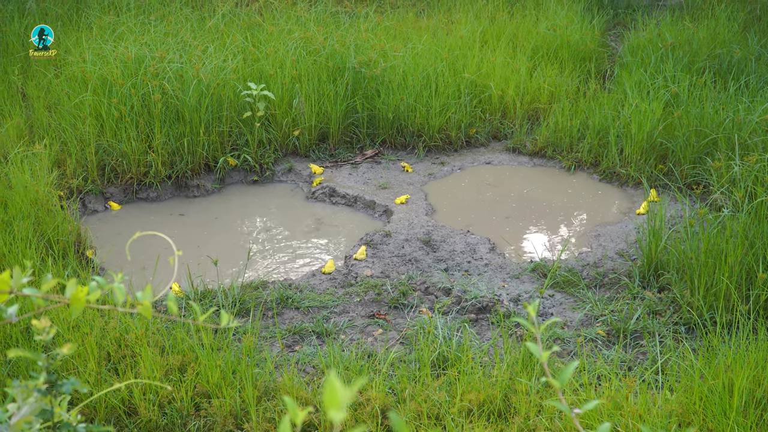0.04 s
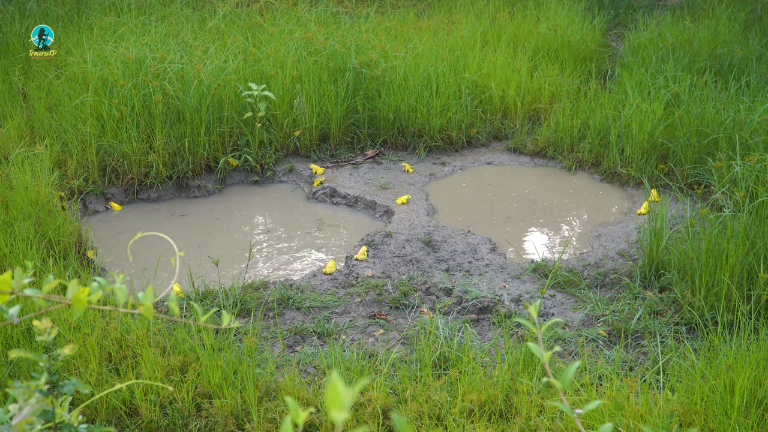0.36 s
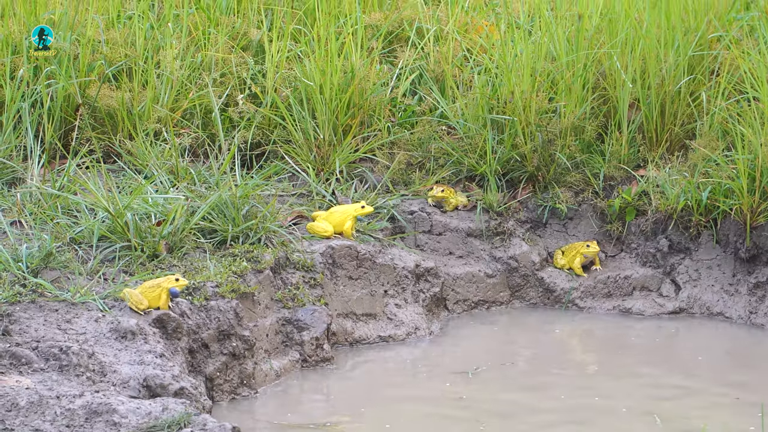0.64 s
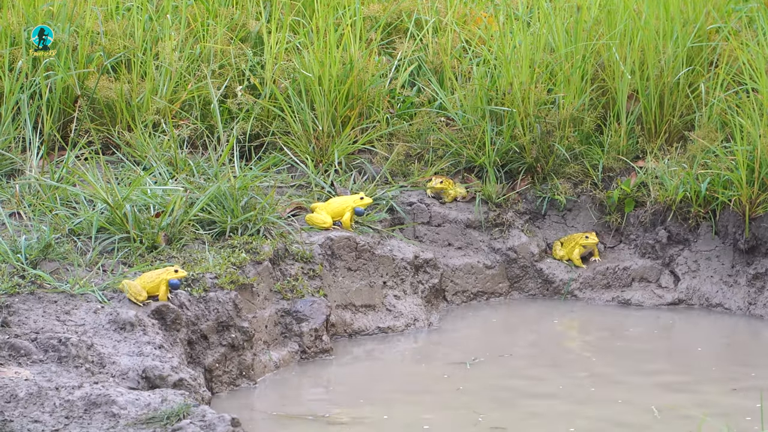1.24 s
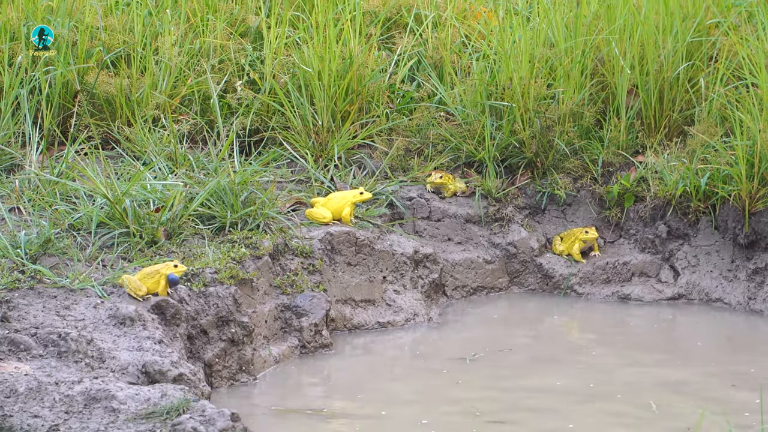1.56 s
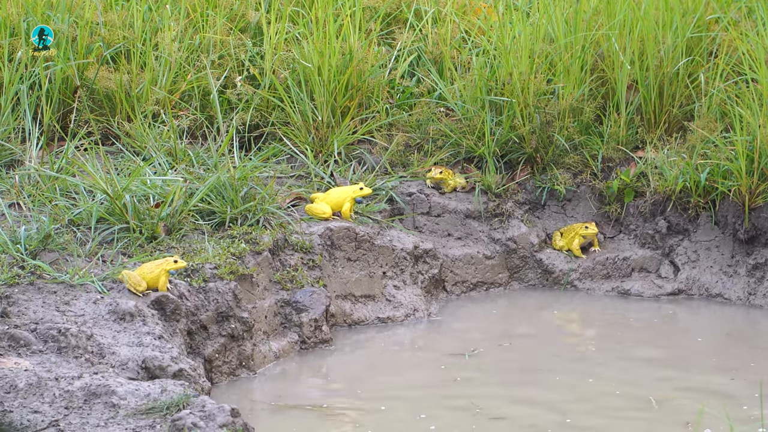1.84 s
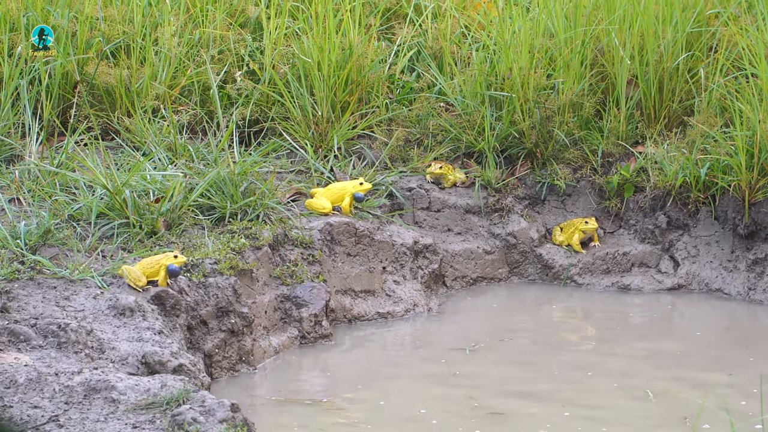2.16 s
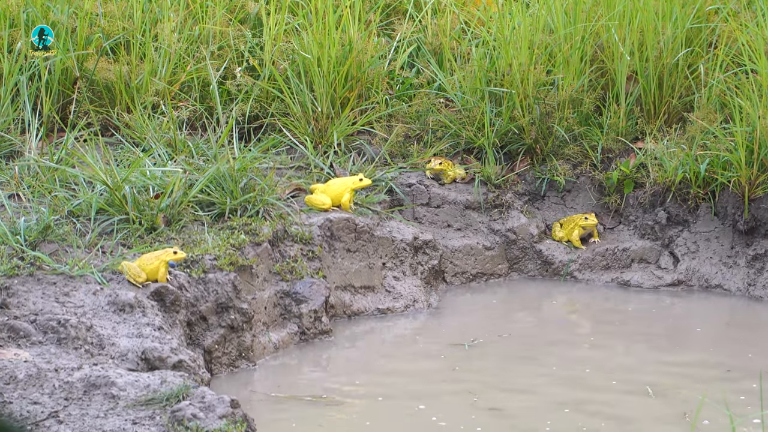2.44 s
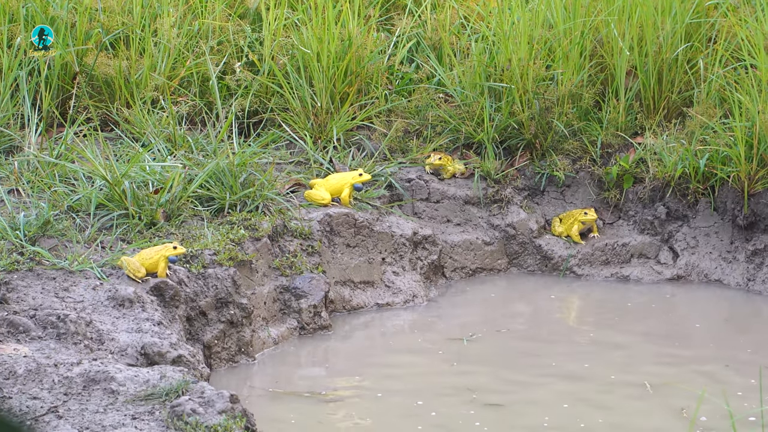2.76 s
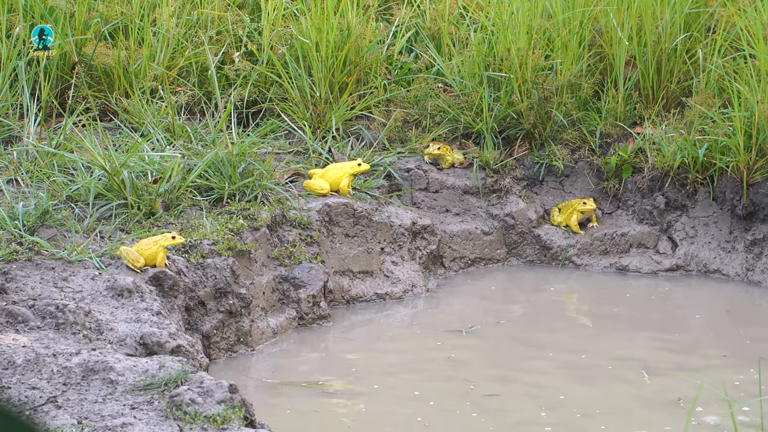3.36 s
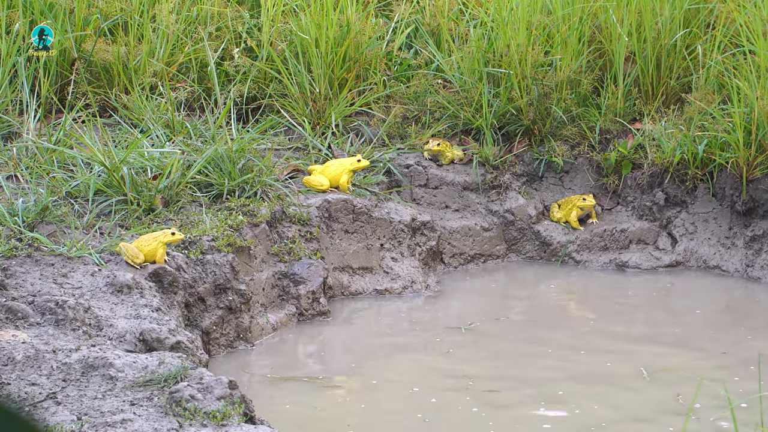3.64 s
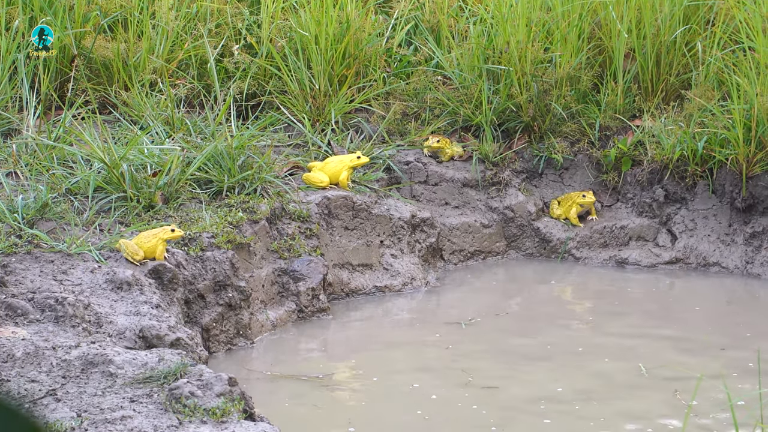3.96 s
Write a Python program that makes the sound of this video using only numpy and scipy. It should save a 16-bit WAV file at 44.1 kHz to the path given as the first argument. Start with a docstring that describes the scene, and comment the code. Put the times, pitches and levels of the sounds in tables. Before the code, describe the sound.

Several frogs trade loud, pulsing croaks outdoors by a pool, some near and some farther off. Behind them insects hiss and buzz in the grass, with a brief low wind rumble on the microphone and later quick, high bird chirps.

```python
"""A muddy pool, with bullfrogs croaking in overlapping turns near and far. Each croak is a train of
about 75 pulses a second that slows as the air runs out; a pulse is two snaps of the vocal cords that
ring the vocal sacs and the throat. Behind them insects hiss and buzz in the grass, small birds chirp,
and a breeze rocks the microphone. The background steps up early on, as the microphone moves closer."""
import sys
import numpy as np
from scipy import signal
from scipy.fft import rfft, irfft, next_fast_len
from scipy.io import wavfile
from scipy.ndimage import uniform_filter1d, minimum_filter1d, map_coordinates

SR = 44100
rng = np.random.default_rng(int(sys.argv[2]) if len(sys.argv) > 2 else 0)


def log_audio(samples):
    """Write samples as a 16-bit WAV file to the path given in sys.argv[1]."""
    # one column per channel
    frames = np.atleast_2d(samples).T
    # limit to full scale, then quantise
    limited = np.clip(frames, -1, 1)
    pcm = np.round(limited * 32767).astype(np.int16)
    wavfile.write(sys.argv[1], SR, pcm)


N = 176400
TIME = np.arange(N) / SR


def amp(db):
    return 10 ** (np.asarray(db) / 20)


def unit_rms(x):
    return x / np.sqrt(np.mean(x ** 2) + 1e-20)


def along(points, hz):
    """Read (frequency, value) points on a log axis."""
    freqs, values = np.transpose(points)
    return np.interp(np.log(hz + 1), np.log(freqs + 1), values)


def curve(points):
    """Read (time, value) points at every sample."""
    return np.interp(TIME, *np.transpose(points))


def filtered(x, response):
    """Shape x by a gain that depends on frequency."""
    size = next_fast_len(N + SR // 2)
    return irfft(rfft(x, size) * response(np.fft.rfftfreq(size, 1 / SR)), size)[:N]


def noise(spectrum):
    """Coloured noise of rms 1."""
    return unit_rms(filtered(rng.standard_normal(N), lambda hz: amp(along(spectrum, hz))))


def wobble(per_s):
    """A smooth random curve with per_s knots a second."""
    return map_coordinates(rng.standard_normal(4000), [TIME * per_s], mode="wrap")


def minimum_phase(gain):
    """A causal response of energy 1, shaped like gain."""
    cepstrum = irfft(np.log(np.maximum(gain, 1e-6)))
    half = len(cepstrum) // 2
    cepstrum[1:half] *= 2
    cepstrum[half + 1:] = 0
    return np.exp(rfft(cepstrum)) / np.sqrt(np.mean(gain ** 2))


def add(out, start_s, x):
    """Mix x into out from start_s."""
    i = int(np.floor(start_s * SR))
    a, b = max(i, 0), min(i + len(x), N)
    if b > a:
        out[a:b] += x[a - i:b - i]


def glide(length_s, start_hz, end_hz):
    """A sine that swells and fades as it slides."""
    progress = np.linspace(0, 1, int(length_s * SR))
    phase = 2 * np.pi * np.cumsum(start_hz + (end_hz - start_hz) * progress) / SR
    return np.sqrt(2) * np.sin(np.pi * progress) ** 2 * np.sin(phase)


# Wind on the microphone: (time [s], level [dB])
BREEZE_LEVEL = [(.66, -39.5), (.7, -22), (1.25, -22), (1.4, -30.5)]
# Its rumble: (frequency [Hz], level [dB])
BREEZE_SPECTRUM = [(15, 1.5), (24, -10), (42, -9), (65, -29.5), (130, -33.5), (250, -32), (600, -84)]

def breeze():
    """A breeze rocks the microphone and makes it rumble."""
    return amp(curve(BREEZE_LEVEL)) * noise(BREEZE_SPECTRUM)


# The chorus out in the grass: (frequency [Hz], level [dB])
INSECT_SPECTRUM = [(300, -1), (3000, -0.5), (3900, -11.5), (4900, 6.5), (5500, 6), (6100, -4), (7300, -10),
                   (8300, 3), (9500, -4.5), (10300, -15), (12000, -22.5), (15500, -25)]
# Its strength at the microphone: (time [s], level [dB])
INSECT_LEVEL = [(.66, -44.5), (.675, -32.5), (1.3, -33), (2.7, -36.5), (4, -38.5)]

def insect_chorus(flutter_db=1.1, move_s=.667, dull_hz=13500):
    """A fluttering hiss, duller on top until the microphone moves closer."""
    chorus = noise(INSECT_SPECTRUM) * amp(curve(INSECT_LEVEL) + flutter_db * wobble(per_s=60))
    distant = filtered(chorus, lambda hz: 1 / (1 + (hz / dull_hz) ** 10))
    return np.where(TIME < move_s, distant, chorus)


def buzz(starts, centre_hz, db, length_s=.13, width_hz=160, octave_db=-23):
    """One insect: bursts of narrow-band noise with a faint octave above."""
    gate = sum(np.sqrt(abs(np.sin(np.pi * np.clip((TIME - s) / length_s, 0, 1)))) for s in starts)
    peak = lambda hz: np.exp(-.5 * ((hz - centre_hz) / width_hz) ** 2)
    band = filtered(rng.standard_normal(N), lambda hz: peak(hz) + amp(octave_db) * peak(hz / 2))
    return amp(db) * gate * unit_rms(band)


# Buzzes of a lower and a higher insect: (start [s])
LOW_BUZZES = [1.03, 1.18, 2.22, 2.39, 3.56]
HIGH_BUZZES = [0.77, 1.17, 2.49]

def near_insects():
    """Two insects buzz closer to the microphone than the chorus."""
    return buzz(LOW_BUZZES, centre_hz=5410, db=-35.5) + buzz(HIGH_BUZZES, centre_hz=5740, db=-39)


# Reverberation around the pool: (frequency [Hz], time to fall 60 dB [s])
POOL_DECAY = [(200, 0.26), (12000, .12)]

def bank_scatter(x, wet_db):
    """Sound reaches the microphone directly and scattered off the banks and the grass."""
    hz, t, spectra = signal.stft(rng.standard_normal(SR // 3), SR, nperseg=256)
    decay = amp(-60 * t / along(POOL_DECAY, hz)[:, None])
    tail = signal.istft(spectra * decay, SR, nperseg=256)[1]
    return x + amp(wet_db) * signal.fftconvolve(x, tail / np.linalg.norm(tail))[:N]


# Runs of chirps behind the frogs: (start [s], chirps [count], top pitch [Hz], level [dB])
CHIRP_RUNS = [(2.49, 2, 5360, -37), (2.69, 3, 5410, -36), (2.87, 3, 5470, -36), (3.036, 2, 5960, -27.5),
              (3.277, 3, 5900, -25), (3.553, 3, 5910, -24), (3.802, 3, 5910, -24.5), (3.66, 4, 3450, -36)]
# Faint whistles: (start [s], length [s], start pitch [Hz], end pitch [Hz], level [dB])
WHISTLES = [(.65, .14, 3750, 4150, -38), (.965, .09, 4650, 3950, -37)]
# Pairs of thin pips: (start [s])
PIP_PAIRS = [.14, .305, .465]

def birds(chirp_s=.03, spacing_s=.04, fall_ratio=.75, waver_db=3, pip_hz=6950, pip_db=-51.5):
    """Small birds: falling chirps and whistles waver and scatter; the pips stay steady and dry."""
    song, pips = np.zeros(N), np.zeros(N)
    for start, count, top_hz, db in CHIRP_RUNS:
        chirp = glide(chirp_s, top_hz, top_hz * fall_ratio)
        for k in range(round(count)):
            add(song, start + k * spacing_s, amp(db - 6 * (k == 0)) * chirp)  # a run opens softer
    for start, length, start_hz, end_hz, db in WHISTLES:
        add(song, start, amp(db) * glide(length, start_hz, end_hz))
    for start in PIP_PAIRS:
        for k in range(2):
            add(pips, start + k * spacing_s, amp(pip_db) * glide(chirp_s, pip_hz, pip_hz))
    song *= amp(waver_db * wobble(per_s=280))
    return bank_scatter(song, wet_db=-1) + pips


# Resonance of the vocal sacs, shared by all the frogs: (frequency [Hz], level [dB])
SAC_SPECTRUM = [(150, -65.5), (260, -41.5), (310, -12.5), (380, -0.5), (455, -0.5), (520, -12),
                (620, -28.5), (1000, -58.5)]
SNAP_GAP_S, GAP_SCATTER = .0021, .07  # between the two snaps of a pulse
RING_LAG_S, RING_SLACK, RING_SCATTER = .00049, .046, .013  # the ring goes flat at low effort and strays
SAC_LEAD_S, JITTER_S, PULSE_SCATTER_DB = .003, .00006, 1.5
THROAT_TOP_HZ, TREBLE_LAG_S_PER_HZ = 4000, 7e-7
THROAT_POWER = 1.45  # the throat grows faster with effort than the sacs

def frog(croaks, throat_spectrum, ring_width_hz, ring_db, second_snap, wet_db, size=2048):
    """Each pulse swells the sacs, then two vocal cord snaps sound the throat, with one gliding ring."""
    hz, out = np.fft.rfftfreq(size, 1 / SR), np.zeros(N)
    sac = minimum_phase(amp(along(SAC_SPECTRUM, hz)))
    throat = minimum_phase(amp(along(throat_spectrum, hz)))
    delay = lambda s: np.exp(-2j * np.pi * hz * s)
    soft_late_treble = delay(TREBLE_LAG_S_PER_HZ * hz / 2) / (1 + (hz / THROAT_TOP_HZ) ** 10)
    damping = 1j * hz * ring_width_hz
    taper, lead_s = signal.get_window(("tukey", .2), size), size / 4 / SR
    for start, rise, hold, fall, db, rate, slowing, lateness, start_hz, end_hz, sac_db in croaks:
        length, croak = rise + hold + fall, np.zeros(N)
        t = np.arange(int(length * SR)) / SR
        cycles = np.cumsum(rate - slowing * (t / length) ** lateness) / SR
        pulse_s = np.interp(np.arange(1, cycles[-1]), cycles, t)[:, None]  # one row per pulse
        jitter, loudness, stray = rng.standard_normal((64, 3))[:len(pulse_s)].T[:, :, None]
        effort = np.sin(np.pi / 2 * np.clip(pulse_s / rise, 0, 1))
        effort *= np.clip((length - pulse_s) / fall, 0, 1)

        ring_hz = start_hz + (end_hz - start_hz) * (pulse_s / length) ** lateness
        ring_hz *= 1 - RING_SLACK * (1 - effort) + RING_SCATTER * stray
        ring = (damping / (ring_hz ** 2 - hz ** 2 + damping)) ** 2
        ring = 1j * ring / np.sqrt(np.mean(abs(ring) ** 2, axis=1, keepdims=True))
        gap = SNAP_GAP_S * (1 + GAP_SCATTER * stray)
        snaps = (delay(SNAP_GAP_S - gap) + second_snap * delay(SNAP_GAP_S)) / np.hypot(1, second_snap)
        voice = (snaps * throat + amp(ring_db) * ring * delay(RING_LAG_S)) * soft_late_treble
        spectra = amp(sac_db) * effort * sac * delay(-SAC_LEAD_S) + effort ** THROAT_POWER * voice

        onsets = start + pulse_s + JITTER_S * jitter - lead_s
        gain = amp(db + PULSE_SCATTER_DB * loudness) * np.sqrt(SR / rate)
        pulses = gain * irfft(spectra * delay(lead_s + onsets * SR % (1 / SR)))
        for onset, pulse in zip(onsets[:, 0], pulses):
            add(croak, onset, pulse * taper)
        out += bank_scatter(croak, wet_db)
    return out


# Croaks around the pool, ending with the frog nearest the microphone:
# (start [s], rise [s], hold [s], fall [s], level [dB], rate [pulses/s], rate lost by the end [pulses/s],
#  lateness of slowing and glide [exponent, 1 = even], ring start [Hz], ring end [Hz], sac level [dB])
FAR_CROAKS = [(.27, 0.055, 0.085, .19, -27, 87.44, 19.3, 1.02, 1690, 1614, 1.1),
              (1.48, 0.092, .05, 0.14, -27, 85.24, 15.6, 1.42, 1500, 1460, 4),
              (2.2, 0.072, 0.071, 0.14, -26, 81.95, 12, 1.27, 1500, 1520, 3.6),
              (2.28, 0.075, 0.083, .15, -28.5, 80.94, 7.8, 1.5, 1730, 1720, 1.1),
              (2.4, .07, .04, 0.17, -33.5, 74.75, 11, 2.7, 1433, 1200, 1.1),
              (3.12, 0.099, 0.078, .16, -28.5, 81.23, 9.9, 1.58, 1506, 1610, 3.6),
              (3.22, 0.075, 0.075, 0.21, -31, 81.43, 9.8, 1.42, 1714, 1700, 0.54)]
DEEP_CROAKS = [(.225, .11, .09, .2, -24, 80, 5, 1, 1670, 1660, -2.9),
               (3.775, .13, .11, .1, -21.5, 75.96, 20, 2, 1300, 1200, 0.2)]
SHRILL_CROAKS = [(1.27, 0.12, 0.065, 0.16, -22.5, 79.5, 6.65, 0.63, 2960, 2880, 0.9),
                 (2.03, 0.088, 0.12, .17, -26, 80.32, 8.7, .6, 3020, 2930, 1.3),
                 (2.88, .1, .07, .18, -23.5, 81.05, 11, 1.1, 2890, 2860, 2.6)]
BANK_CROAKS = [(.585, 0.11, .07, .11, -24.5, 77.27, 8.4, 1.94, 1612, 1270, 0.5),
               (.95, .13, 0.069, 0.052, -30.5, 77.8, 5.9, 1.06, 1830, 1590, 1),
               (1.19, .13, 0.078, .13, -23.5, 76.55, 10.8, 2.2, 1623, 1440, 5),
               (1.94, .13, .06, .17, -29, 77.1, 8, 1.1, 1607, 1560, 7),
               (2.795, .15, 0.067, .1, -27.5, 75.35, 8.5, 3.34, 1576, 1520, 6)]
NEAR_CROAKS = [(-.0555, 0.039, 0.055, .125, -19.5, 75.44, 9.1, 0.74, 1600, 1460, -4.5),
               (.8395, 0.061, .18, .035, -16.5, 79.18, 9.7, 5.3, 1420, 1230, 0),
               (1.6487, 0.13, 0.096, .04, -16.5, 79.5, 7.5, 3, 1814, 1204, -2)]
# Their throat resonances: (frequency [Hz], level [dB])
DEEP_THROAT = [(300, -33), (520, 3), (680, -7), (900, -1), (1550, 1.5), (1950, -10.5), (2750, -4.5),
               (3600, -35)]
SHRILL_THROAT = [(300, -28.5), (800, -3.5), (1300, -3), (1600, 1.5), (2000, -5.5), (3100, -12.5),
                 (3600, -25)]
BANK_THROAT = [(250, -43.5), (600, -3), (850, 8.5), (1150, 7.5), (1850, 1.5), (2200, 0), (3100, -2.5),
               (3600, -20.5)]
NEAR_THROAT = [(250, -24), (650, -10), (900, -4.5), (1200, 3.5), (1850, -1.5), (2300, -17), (3200, -12.5),
               (3600, -31)]

def bullfrogs():
    """Five voices around the water: the nearest is driest, the farthest carries the most scatter."""
    near = frog(NEAR_CROAKS, NEAR_THROAT, ring_width_hz=310, ring_db=.5, second_snap=1.25, wet_db=-5.5)
    bank = frog(BANK_CROAKS, BANK_THROAT, ring_width_hz=202, ring_db=6.5, second_snap=.39, wet_db=-3.5)
    shrill = frog(SHRILL_CROAKS, SHRILL_THROAT, ring_width_hz=190, ring_db=-7, second_snap=.38, wet_db=-5)
    far = frog(FAR_CROAKS, BANK_THROAT, ring_width_hz=184, ring_db=7, second_snap=.35, wet_db=-2.5)
    deep = frog(DEEP_CROAKS, DEEP_THROAT, ring_width_hz=320, ring_db=-2, second_snap=.39, wet_db=-4)
    return far + deep + shrill + bank + near


def scene():
    """One microphone by the pool: frogs in front; birds, insects and breeze behind."""
    return (bullfrogs() + birds() + insect_chorus() + near_insects() + breeze())[None]


def record(dry, ceiling=.99, limiter_s=.001, top_hz=16000):
    """A fast limiter holds the loudest pulses near full scale; nothing above top_hz passes."""
    window = int(limiter_s * SR)
    needed_gain = ceiling / np.maximum(abs(dry[0]), ceiling)
    gain = uniform_filter1d(minimum_filter1d(needed_gain, window), window)
    return filtered(dry[0] * gain, lambda hz: hz < top_hz)[None]


dry = scene()
out = record(dry)
log_audio(out)
```